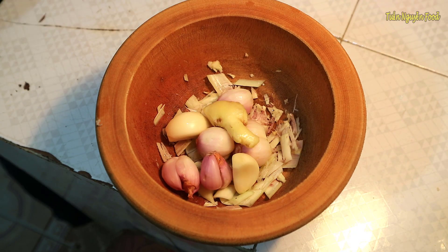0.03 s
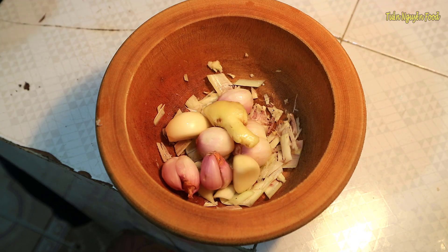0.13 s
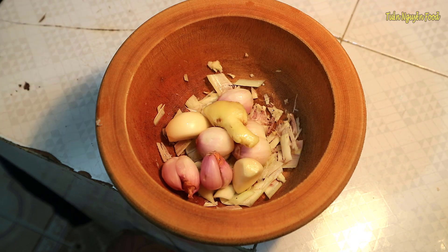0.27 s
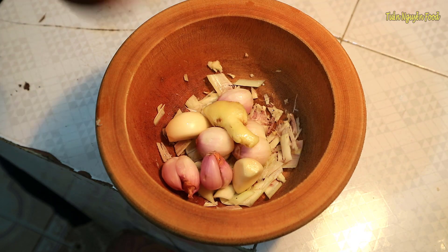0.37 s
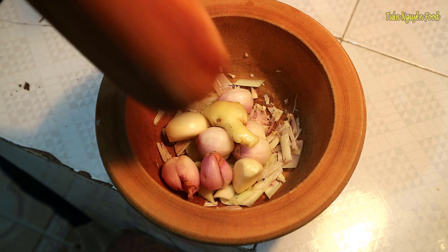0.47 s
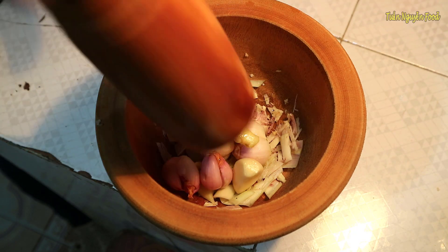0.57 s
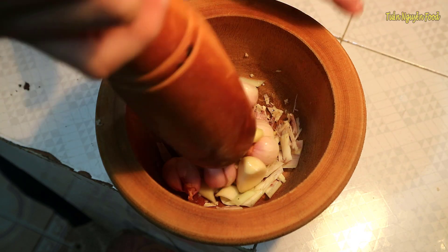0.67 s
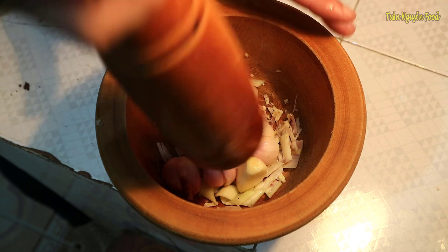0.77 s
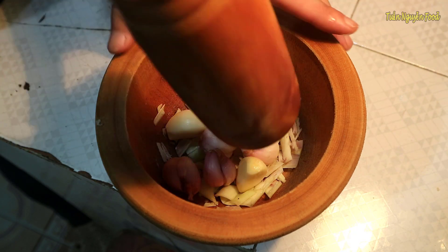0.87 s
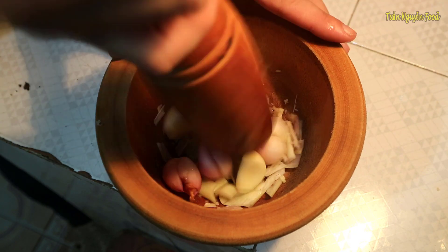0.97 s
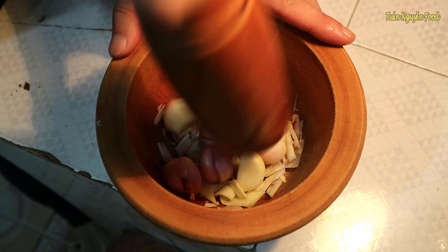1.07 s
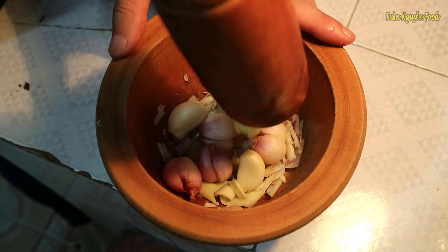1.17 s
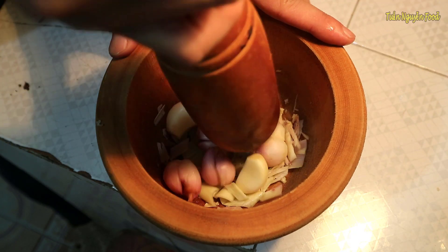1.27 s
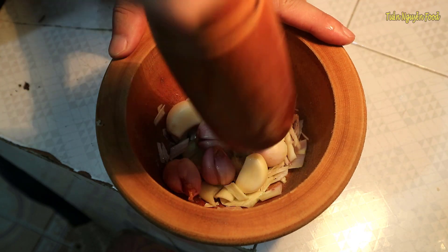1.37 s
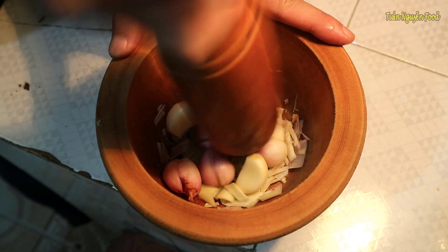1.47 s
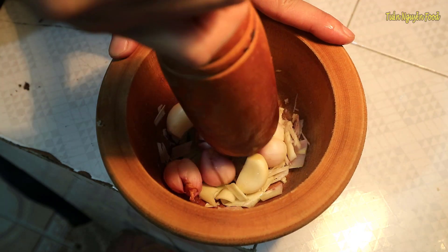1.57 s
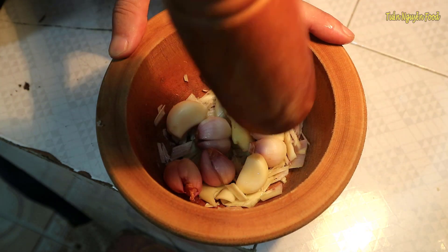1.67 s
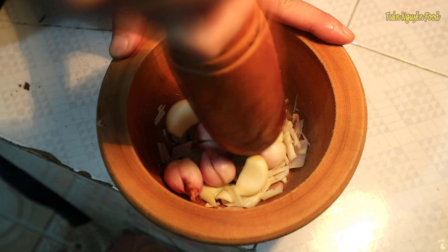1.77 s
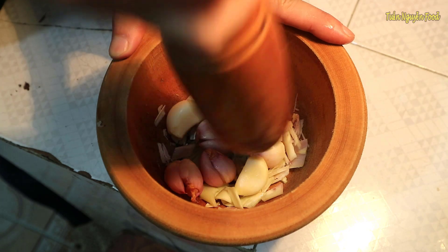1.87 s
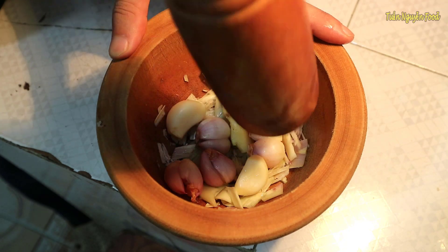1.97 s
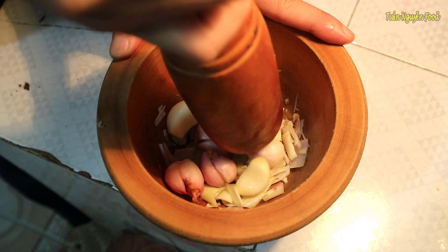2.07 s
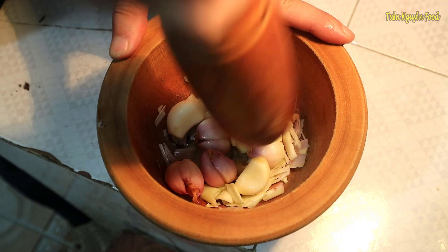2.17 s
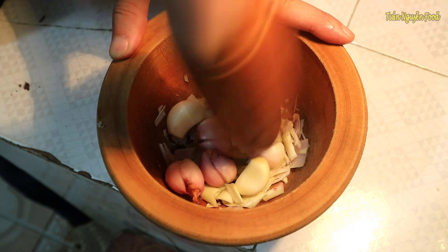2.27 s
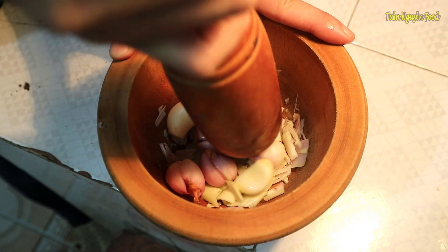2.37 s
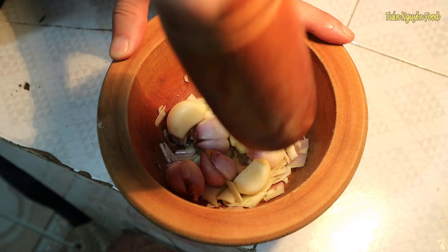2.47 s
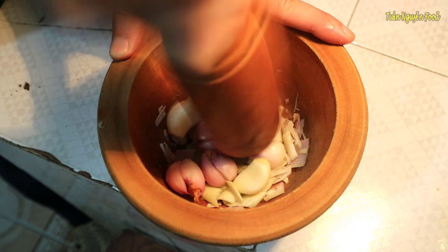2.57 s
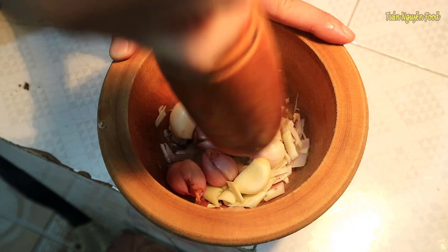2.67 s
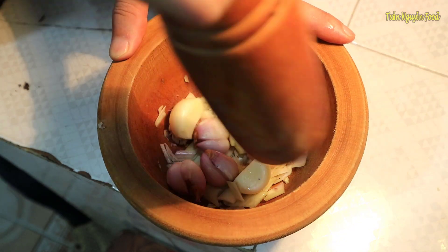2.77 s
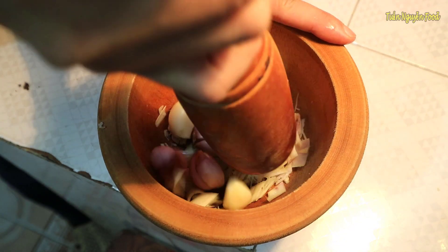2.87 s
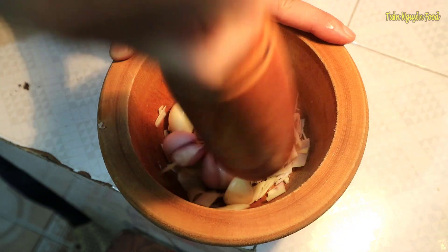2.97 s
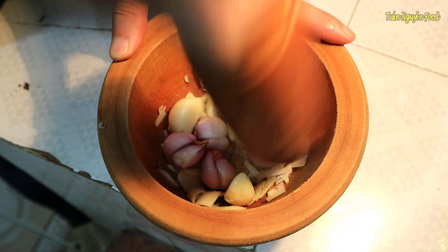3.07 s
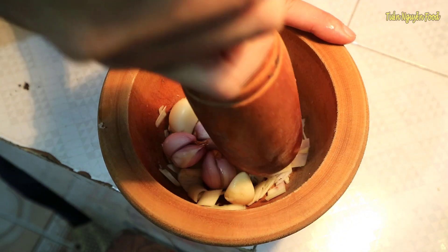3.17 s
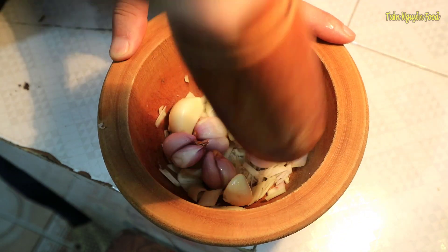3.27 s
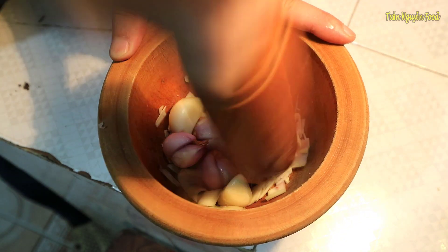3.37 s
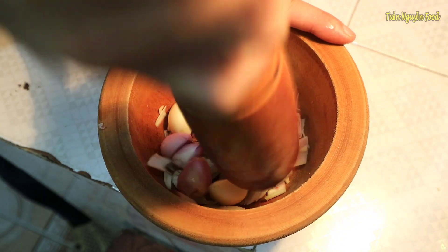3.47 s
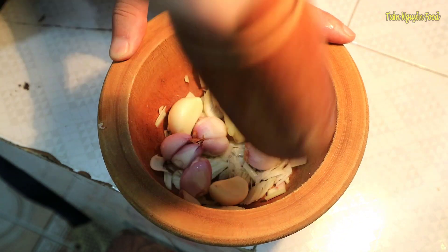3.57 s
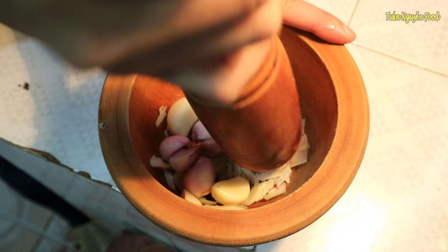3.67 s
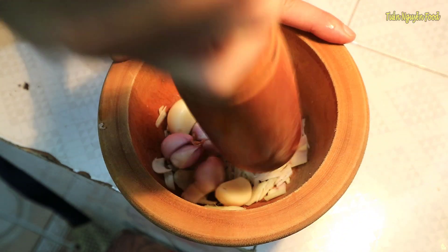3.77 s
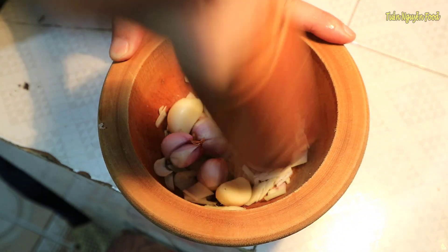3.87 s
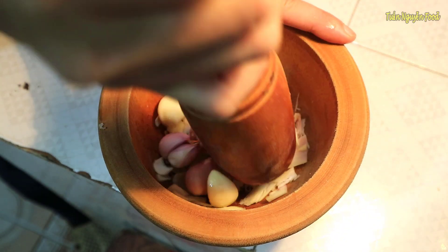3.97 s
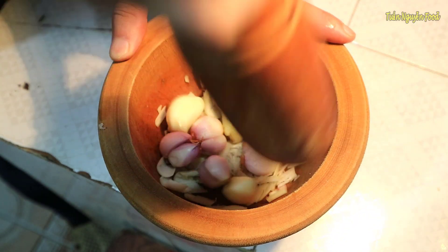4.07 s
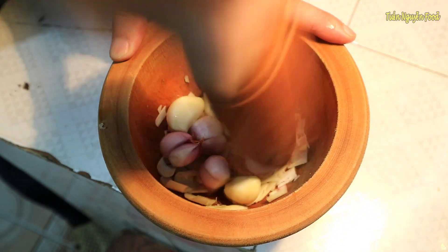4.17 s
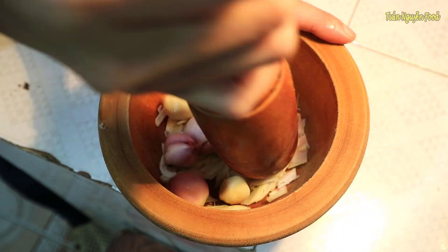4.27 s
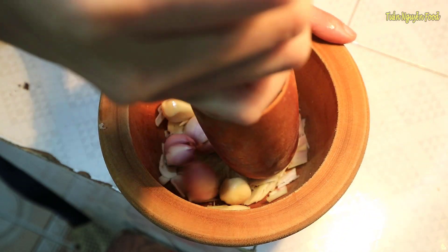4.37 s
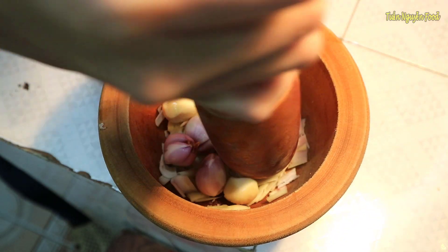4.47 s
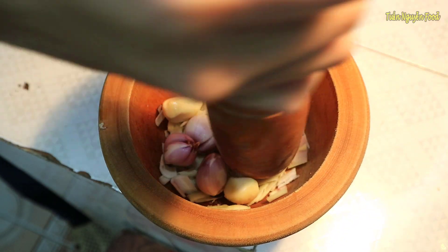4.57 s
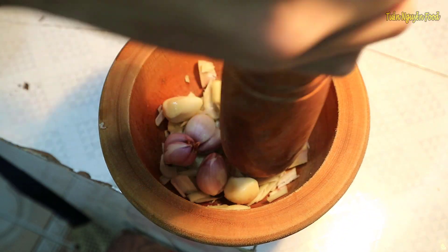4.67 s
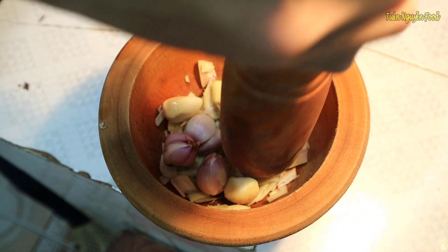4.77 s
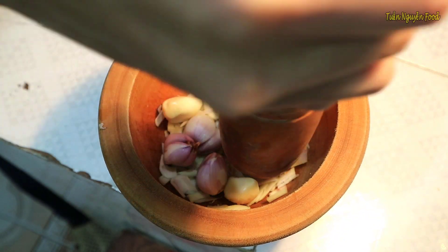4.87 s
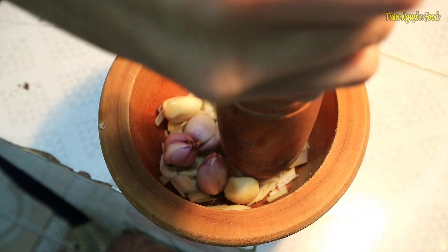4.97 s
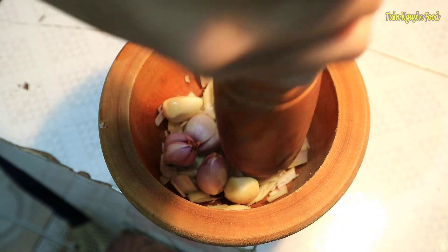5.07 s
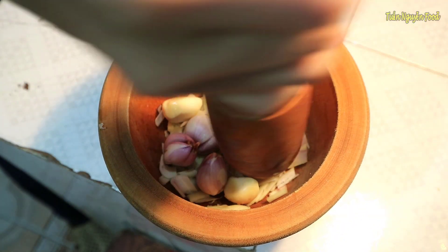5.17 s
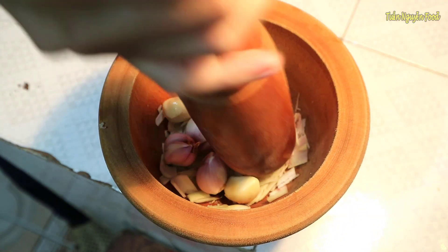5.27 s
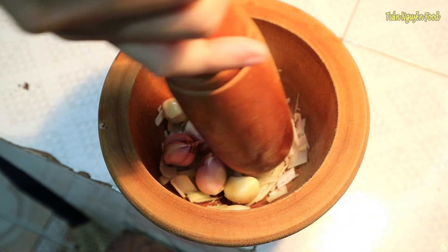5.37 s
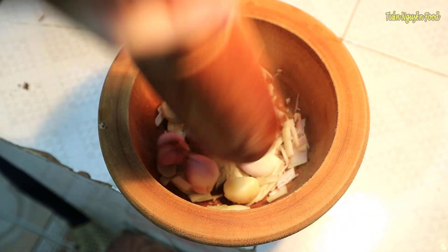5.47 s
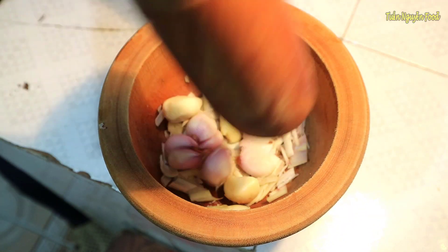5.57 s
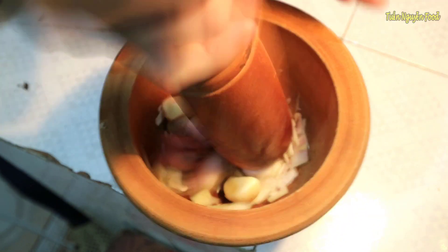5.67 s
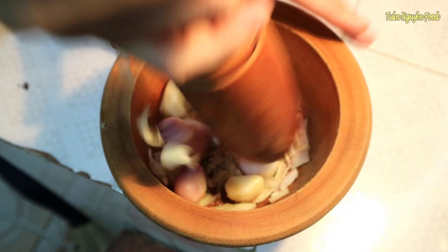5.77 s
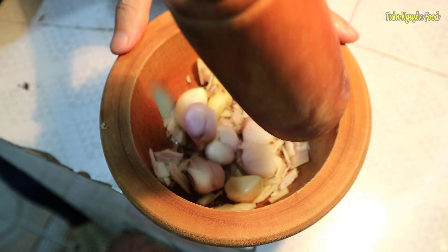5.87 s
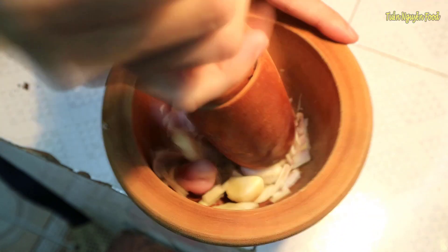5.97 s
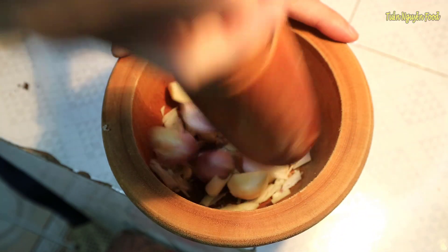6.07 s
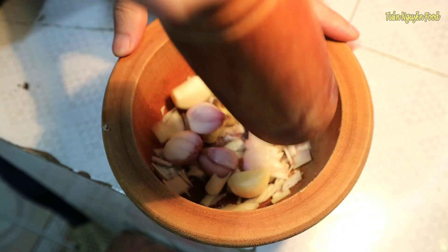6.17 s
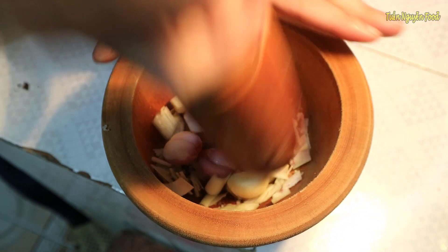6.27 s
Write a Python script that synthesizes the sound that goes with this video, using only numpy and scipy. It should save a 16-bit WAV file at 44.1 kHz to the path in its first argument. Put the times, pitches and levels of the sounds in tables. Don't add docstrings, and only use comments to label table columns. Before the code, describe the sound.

Still kitchen air with a very faint low drone and slight rubbing fills the first 0.7 seconds. At about 0.73 s a wooden pestle lands softly in a wooden mortar, with a small skin tear, starting a steady run of blows roughly every 0.27 s until 4.24 s. Each is a short, dull, hollow mid-pitched knock, quickly damped by the pulp, joined by a crunchy crack of garlic and shallot and a low thump through the floor. The blow near 3.17 s is especially strong and sharp; crisp cracks stand out around 4 to 4.25 s. Pounding then stops; from about 4.5 to 5.7 s the pestle grinds in soft gritty strokes, with tiny fibre ticks near 5.1 s. Two firm crunchy knocks follow at 5.75 and 6.02 s, then a faint touch at 6.13 s. The sound is close, with brief bright reflections from hard tiled walls, and the right side is louder.

```python
import sys
import numpy as np
from scipy import signal
from scipy.fft import rfft, irfft, next_fast_len
from scipy.io import wavfile
from scipy.ndimage import uniform_filter1d

SR = 44100
rng = np.random.default_rng(int(sys.argv[2]) if len(sys.argv) > 2 else 0)


def waveform_to_disk(signal):
    frames = np.transpose(np.atleast_2d(signal))
    scaled = np.clip(frames, -1, 1) * 32767
    samples = np.round(scaled).astype(np.int16)
    wavfile.write(sys.argv[1], SR, samples)


def undo_db(level):
    steps = np.asarray(level, float) / 20
    return 10 ** steps


N = 278712


def read(points, hz):
    f, value = np.transpose(points)
    return np.interp(np.log(hz + 1), np.log(f + 1), value)


def rms(x):
    return np.sqrt(np.mean(x ** 2) + 1e-20)


def evened(x):
    return x / rms(x)


def add(mix, s, sound):
    part = mix[max(round(s * SR), 0):][:len(sound)]
    part += sound[:len(part)]


def shaped(x, gain):
    size = next_fast_len(x.shape[-1] + 4096)
    spectrum = rfft(x, size) * gain(np.fft.rfftfreq(size, 1 / SR))
    return irfft(spectrum, size)[..., :x.shape[-1]]


def sine(hz, t, turn=0):
    return np.sin(2 * np.pi * (hz * t + turn))


def stroke(t, up_ms, down_ms):
    ms = t * 1000
    rise = -(ms / max(up_ms, .3)) ** 2
    fall = -(abs(ms) / max(down_ms, .3)) ** 0.88
    return np.exp(np.where(t < 0, rise, fall))


# f/Hz, likeness [0 to 1]
PORT_LIKENESS = [(60, 0.64), (200, 0.99), (400, 0.72), (800, 0.19), (1500, 0.057), (4000, 0.033),
                 (12000, 0.1)]


def pair(a, b, near):
    def same(hz):
        return np.clip(read(PORT_LIKENESS, hz) + near, 0, 1)

    left = shaped(a, same) + shaped(b, lambda hz: np.sqrt(1 - same(hz) ** 2))
    return np.array([left, a])


# f/Hz, level/dB
AIR_COLOUR = [(15, -36), (25, -11), (96, 0.5), (213, 2.5), (286, -3), (335, 3.5), (498, -5.5), (569, -3.5),
              (966, -6.5), (1160, -7.5), (1360, -14.5), (2250, -14.5), (9170, -28), (11300, -36.5),
              (14000, -50)]


def air():
    a, b = shaped(rng.standard_normal((2, N)), lambda hz: undo_db(read(AIR_COLOUR, hz)))
    level_db, ports_db = -62, [[5.5], [2.5]]
    return pair(a, b, near=-0.11) / np.std(a) * undo_db(level_db) * undo_db(ports_db)


# t/s, level/dB
ECHOES = [(.0065, -17), (.011, -14.5), (.016, -21), (.020, -12), (.033, -21), (.046, -49.5)]
# f/Hz, t60/s
ROOM_T60 = [(200, 0.79), (800, 0.3), (1500, 0.4), (3000, 0.28), (6000, 0.33), (12000, 0.28), (13500, 0.17)]
# f/Hz, level/dB, t60/s
RINGS = [(292, -58.5, 0.39), (334.9, -61, .38), (441.7, -53, 0.46), (550, -64, 0.27), (595, -62, 0.35),
         (776, -64.5, 0.31), (855, -69, 0.24), (866, -65.5, 0.35), (953, -62.5, 0.13), (1260, -60, 0.36),
         (1396, -66.5, 0.26), (2810, -64, 0.24), (3040, -64.5, .3), (4300, -63, 0.16)]


def kitchen(knock, crush, wet_db):
    taps = np.zeros((2, SR))
    slots = np.arange(120, SR - 20, 8)
    at = slots + rng.integers(0, 8, (2, len(slots)))
    np.put_along_axis(taps, at, rng.choice([-1., 1.], at.shape), 1)
    taps *= 1 - np.exp(-np.arange(SR) / SR / 0.0041)
    hz, t, z = signal.stft(taps, SR, nperseg=256)
    dying = undo_db(-60 * t / read(ROOM_T60, hz)[:, None])
    tail = signal.istft(z * dying, SR, nperseg=256)[1]
    tail = undo_db(wet_db) * pair(*tail, near=0.0091) / np.linalg.norm(tail[0])
    age = np.arange(tail.shape[1]) / SR
    rings = sum(undo_db(db - 60 * age / t60) * sine(hz, age) for hz, db, t60 in RINGS)
    tail = tail + (1 - np.exp(-age / 0.0067)) * rings
    echoes = sum(undo_db(db) * np.roll(knock, round(s * SR)) for s, db in ECHOES)
    return signal.fftconvolve((knock + crush)[None], tail, axes=1)[:, :N] + echoes


# f/Hz, level/dB
GRIND_COLOUR = [(120, -60.5), (200, -17.5), (546, 2), (910, -2.5), (1030, -2), (1490, -2.5), (2080, -3),
                (5590, -14.5), (7410, -17), (11500, -24), (13500, -33)]
# t/s at full pressure, level/dB, swell/s, fade/s, tilt/dB per octave
RUBS = [(.005, -65, .03, .04, 4), (.05, -60.5, .025, .025, 1), (.104, -60, .05, .012, 5.5),
        (.37, -61, 0.031, 0.72, 0.5), (.63, -60.5, 0.31, 0.068, 1.5), (0.692, -56.5, 0.018, 0.059, 2),
        (4.56, -60, 0.089, 0.073, 2), (4.746, -58, 0.08, 0.23, 3), (4.9, -58, 0.066, 0.12, 7),
        (5.05, -48, 0.045, 0.033, 4.5), (5.17, -55.5, .12, 0.13, 2.1), (5.378, -47, 0.064, 0.11, 2.5),
        (5.53, -65.5, 0.082, 0.31, 2), (5.69, -50, 0.012, 0.16, -5), (5.735, -51, 0.063, .03, -2.5),
        (5.85, -61.5, .08, .16, -5)]


def grinding():
    t, fine = np.linspace(0, N / SR, N // 64), np.arange(N) / SR
    lag_s, stir_db, swell_s, fade_s = 0.07, -68, 0.4, 0.2
    pushes = RUBS + [(row[0] + lag_s, stir_db, swell_s, fade_s, 0) for row in THUMPS]
    power = np.array([undo_db(2 * db - 20 * np.where(t < s, (s - t) / up, (t - s) / down))
                      for s, db, up, down, _ in pushes])
    total = power.sum(0)
    tilt_db = np.array([row[-1] for row in pushes]) @ power / (total + 1e-20)
    tilt = np.interp(fine, t, undo_db(tilt_db))
    unevenness = undo_db(2.0 * evened(uniform_filter1d(rng.standard_normal(N), 130)))
    level = np.interp(fine, t, np.sqrt(total)) * unevenness
    grit = shaped(rng.standard_normal((2, N)), lambda hz: undo_db(read(GRIND_COLOUR, hz)))
    dull = shaped(grit, lambda hz: 1 / (1 + (hz / 2800) ** 2))
    bright = grit - dull
    a, b = level * (dull / tilt + bright * tilt) / np.std(grit)
    ports_db = [[6.5], [1.5]]
    return pair(a, b, near=0.014) * undo_db(ports_db)


# t/s, level/dB, centre f/Hz, length/ms
TEARS = [(.706, -43.5, 900, 7), (0.709, -42, 3530, 8.5), (.718, -38, 735, 7.5), (0.723, -37, 4220, 6.7),
         (0.721, -39.5, 2900, 8), (1.327, -40, 3220, 6.5), (1.33, -45, 5630, 4), (1.583, -48, 3000, 5),
         (1.604, -47, 3040, 8), (1.822, -31, 2900, 5), (2.894, -40, 2950, 6.5), (3.437, -31.5, 2900, 6.4),
         (4.237, -22, 4340, 4.5), (5.686, -45.5, 1900, 9), (5.705, -43, 2200, 9.7), (5.739, -29, 905, 4),
         (5.741, -36.5, 3000, 5), (6.016, -27, 4350, 5.4)]
# t/s, level/dB, centre f/Hz, length/ms
TICKS = [(.046, -54, 2190, 1.6), (0.084, -52, 4500, 1.3), (.105, -57, 4500, 2.5), (.768, -55, 700, 3),
         (.779, -54, 696, 3), (1.584, -46.5, 6000, 2.5), (1.602, -47, 6000, 2.2), (1.61, -43.5, 6000, 1.8),
         (1.619, -46, 5940, 1.9), (1.622, -47, 3330, 2.7), (1.907, -46.5, 5850, 1.3),
         (5.1097, -35, 3560, 0.36), (5.1315, -43.5, 795, 2.3), (5.158, -51, 3000, .7),
         (5.332, -60, 2500, 1.8), (5.985, -52, 3000, 1.1)]


def snaps():
    out, t = np.zeros(N), np.arange(-400, 1200) / SR
    for s, db, hz, ms in TEARS + TICKS:
        noise = shaped(rng.standard_normal(len(t)), lambda f: 1 / (1 + ((f - hz) / (0.17 * hz)) ** 2))
        shape = stroke(t, 0.23 * ms, ms)
        add(out, s + t[0] + 0.001017, undo_db(db) * evened(noise * shape) * rms(shape))
    return out


# t/s, thump level/dB, foot of the bowl level/dB, belly level/dB
THUMPS = [(0.735, -63, -40, -38), (1.02, -57, -30, -29.5), (1.302, -55, -38.5, -37.5),
          (1.553, -50, -30.5, -26), (1.8263, -46, -34.5, -24.5), (2.103, -39, -28.5, -24),
          (2.3623, -37.5, -25, -24), (2.6341, -38, -27.5, -26), (2.899, -51.5, -38, -33.5),
          (3.1734, -50, -33, -25.5), (3.4407, -48.5, -30, -26.5), (3.7131, -42, -31, -37),
          (3.9699, -43, -33.5, -27), (4.2422, -50, -35.5, -39), (5.752, -43.5, -31, -27.5),
          (6.025, -42, -30.5, -28)]
# f/Hz, level/dB, t60/s, sign at the microphone
THUMP_MODES = [(98.3, -.2, 1.1, 1), (112.8, 5.1, .72, -1), (122.3, 14.8, .24, -1), (135.4, 3.9, .7, -1),
               (147.6, -2.4, 1.1, 1), (161.5, 5.5, .64, 1), (185.8, 4.3, .41, -1), (191.7, 3.2, .6, 1),
               (226, -6, .4, -1), (247, -7, .35, 1), (268, -9, .35, -1), (291, -8, .4, 1)]


def thumps():
    out, t = np.zeros(N), np.arange(30000) / SR
    age = t + .0137
    waves = 0
    for hz, db, t60, sign in THUMP_MODES:
        upper_db = 0.65 * (hz > 118)
        waves = waves + sign * undo_db(db + upper_db - 60 * age / t60) * sine(hz, age)
    swell = (1 - np.exp(-t / 0.0035)) ** 2
    for s, db, _, _ in THUMPS:
        add(out, s, undo_db(db) * swell * waves)
    return out


# t/s, level/dB, dying/ms, tilt/dB per octave, sharp crack above/dB
CRUSHES = [(0.7282, -42.5, 10, -0.5, 12), (1.0146, -34, 11.7, -1.4, -8.5), (1.0392, -45.5, 6.7, -2.5, 0),
           (1.2977, -33.5, 7.4, 0, 2), (1.5536, -32, 3.1, -1, 3.5), (1.8254, -28.5, 1.86, -0.5, -2),
           (2.1015, -29.5, 3.6, -4, 15), (2.3627, -26.5, 1.5, -0.5, -6.5), (2.6333, -26.5, 4.8, -5.5, 17.5),
           (2.8967, -30, 3, -0.1, 13), (3.1738, -16.5, 0.66, 2.5, -10.5), (3.44, -28, 2.9, 0.8, 15),
           (3.711, -28.5, 4.9, 2.5, 12), (3.9687, -22, 2.1, 1.5, -33), (4.242, -19.5, 3.3, -3, 7),
           (5.7496, -23.5, 4.6, -1.2, 7.5), (6.0238, -23, 5.8, -0.8, 11.5)]
# f/Hz, level/dB
CRUSH_COLOUR = [(710, -15), (1200, -10), (2010, -16.5), (2500, -11.5), (3010, -14), (4140, -11),
                (5270, -15), (7090, -14), (8450, -18.5), (11100, -23), (12000, -31), (15400, -32.5),
                (16500, -52)]
# f/Hz, half width/Hz, level/dB
PESTLE = [(2900, 410, 3), (4500, 97, -7)]


def crushes():
    out, t = np.zeros((3, N)), np.arange(-800, 1600) / SR
    for s, db, down_ms, tilt_db, crack_db in CRUSHES:
        def colour(hz):
            tilted = undo_db(read(CRUSH_COLOUR, hz) + tilt_db * np.log2(hz / 4000 + 0.0081))
            return tilted / (1 + (900 / (hz + 1)) ** 4)

        def rung(hz):
            return colour(hz) * (1 + sum(undo_db(d) / (1 + ((hz - f) / w) ** 2) for f, w, d in PESTLE))

        lumps = undo_db(3.92 * evened(uniform_filter1d(rng.standard_normal(len(t)), 24)))
        grit = shaped(rng.standard_normal((2, len(t))), colour)
        squeeze = lumps * stroke(t, 3.88, down_ms)
        crack = undo_db(crack_db - 4) * stroke(t, 0.54, 0.21)
        burst = squeeze + crack
        sent = shaped(1. * (t == 0), rung)
        for port, part in zip(out, [grit[0] * burst, grit[1] * burst, sent]):
            add(port, s + t[0], undo_db(db - 2.0) * evened(part) * rms(burst))
    return out


# f/Hz, build-up/ms, dying/ms
BASE = [
    (334.7, 3.07, 4.64),
    (614, 2.75, 2.7),
]


def base_knocks():
    out, t = np.zeros(N), np.arange(-600, 1500) / SR
    lead_s = 0.00196
    for s, _, foot_db, belly_db in THUMPS:
        for db, (hz, up_ms, down_ms) in zip((foot_db, belly_db), BASE):
            ring = stroke(t, up_ms, down_ms) * sine(hz, t, rng.random())
            add(out, s - lead_s + t[0], undo_db(db + 4.5) * ring)
    return out


# t/s at the bottom of the stroke, hollow mode level/dB, its f/Hz, wall contact/dB, rim contact/dB
BLOWS = [(0.7343, -30, 618, -8, -33.5), (.7514, -40, 680, -28.5, -4), (1.016, -18.5, 745, -5.5, -27.5),
         (1.2992, -25, 773, -13, -28), (1.553, -16, 824, -7.5, -32), (1.8248, -18, 860, -2.5, -21),
         (2.1001, -17, 796, -9, -4), (2.3614, -18, 760, -5.5, -16), (2.6335, -22, 890, 1.5, 3),
         (2.895, -20.5, 832, -12, -18), (3.1729, -12, 855, -9, -12.5), (3.4384, -18.5, 850, -7.5, -13),
         (3.709, -23.5, 822, -11, -8), (3.9702, -21, 767, -17.5, -25.5), (4.2425, -18, 846, -29, -40),
         (5.7483, -17.5, 770, -11, -20), (6.02, -19.5, 764, -6.5, -22), (6.126, -33, 740, -16.5, -29)]
# f/Hz, level above the hollow mode/dB, share of wall contact, share of rim contact
BOWL = [(932, -3, 0.37, 0.14), (1110, -2, 0.86, 0.054), (1322, -2.3, 0.088, 1), (1726, -14.5, .1, 0.25)]


def bowl_knocks():
    out, t = np.zeros(N), np.arange(-600, 1500) / SR
    sink_ms, damp_ms = 2.32, 2.04
    for s, db, hollow_hz, wall_db, rim_db in BLOWS:
        modes = [(hollow_hz, db)]
        modes += [(f, db + d + wall * wall_db + rim * rim_db) for f, d, wall, rim in BOWL]
        for (hz, level_db), turn in zip(modes, rng.random(7)):
            hurry = max(hz / 1250, 1) ** 2.2
            ring = stroke(t * hurry, sink_ms, damp_ms) * sine(hz, t, turn)
            add(out, s + t[0], undo_db(level_db + 4.5) * ring)
    return out


def scene():
    knock = bowl_knocks() + base_knocks()
    snap = snaps()
    crush, twin, sent = crushes()
    room = kitchen(knock, undo_db(-2.0) * (sent + snap), wet_db=-11.5)
    pounding = knock + thumps() + pair(crush + snap, twin, near=0.45) + room
    return undo_db(0.5) * pounding + grinding() + air()


# f/Hz, phase/radians
PORT_LAG = [(40, -.9), (100, -1.9), (260, -3.1), (500, -4.3), (800, -5.3), (1000, -6.1), (1200, -4.9),
            (2000, -5.3), (4000, -6.1), (8000, -7.3), (16000, -9.)]
# f/Hz, level/dB
PORT_DB = [(60, -5), (110, -2), (200, -13.5), (350, -8), (700, -7.5), (900, -8), (1300, -5.5), (2500, -6.5),
           (4500, -4.5), (8000, -8), (14000, -5.5)]
# f/Hz, level/dB
MIC = [(20, -9), (50, 3), (85, 3.5), (12000, -0.66), (15800, -1), (16600, -26.5)]


def top_cut(x):
    return signal.sosfilt(signal.butter(12, 16670, fs=SR, output="sos"), x)


def record(dry):
    left = shaped(dry[0], lambda hz: undo_db(read(PORT_DB, hz)) * np.exp(1j * read(PORT_LAG, hz)))
    mix = shaped(np.array([left, dry[1]]), lambda hz: undo_db(read(MIC, hz)))
    return top_cut(mix)


dry = scene()
out = record(dry)
waveform_to_disk(out)
```